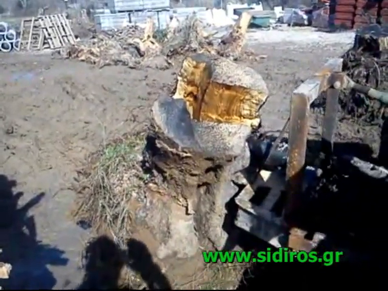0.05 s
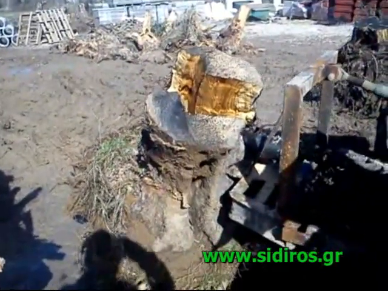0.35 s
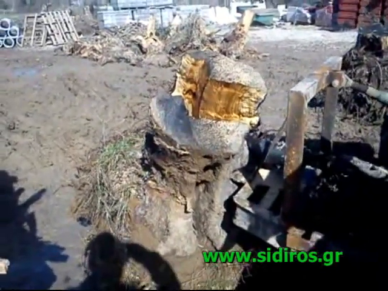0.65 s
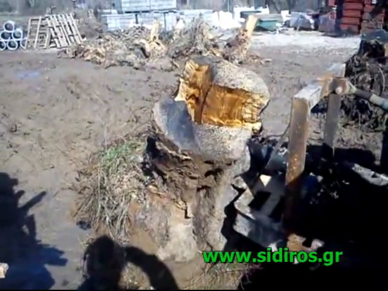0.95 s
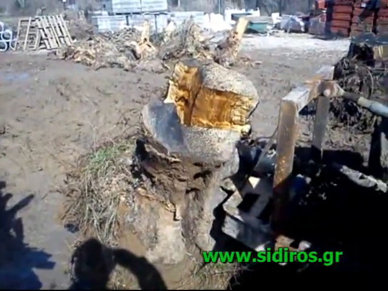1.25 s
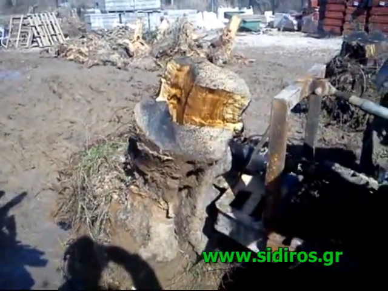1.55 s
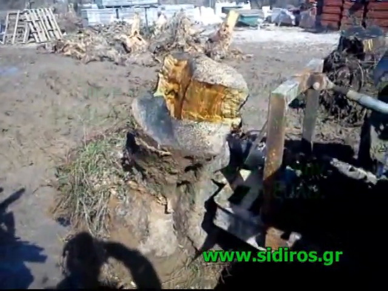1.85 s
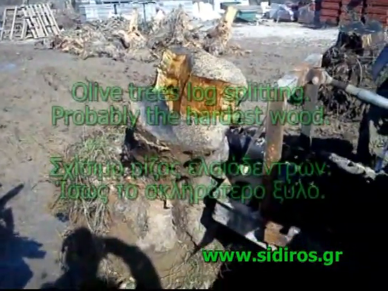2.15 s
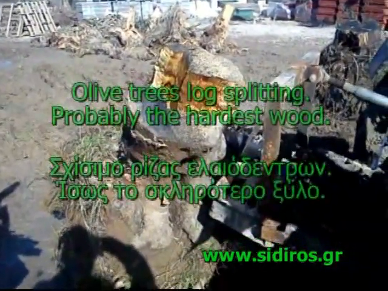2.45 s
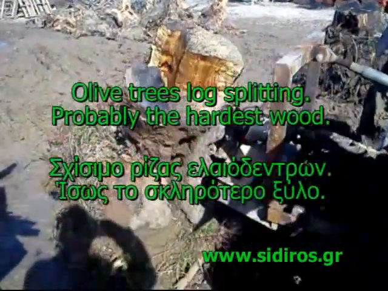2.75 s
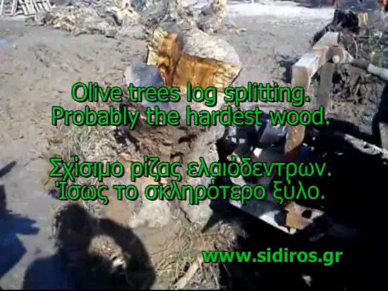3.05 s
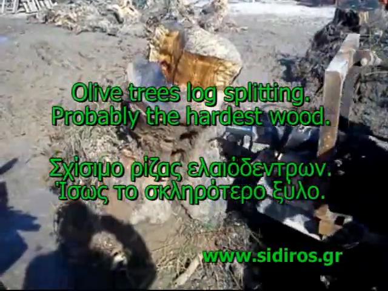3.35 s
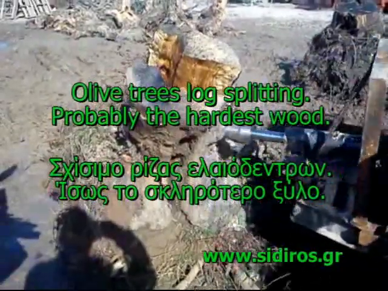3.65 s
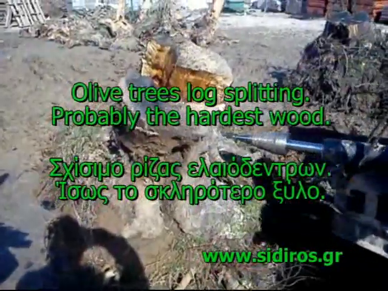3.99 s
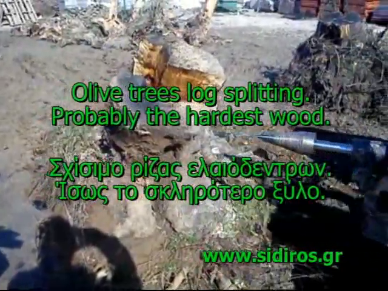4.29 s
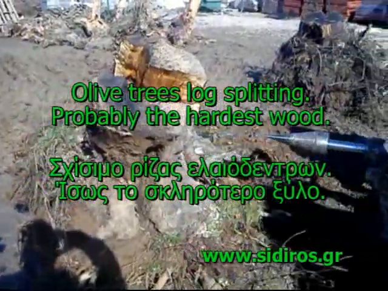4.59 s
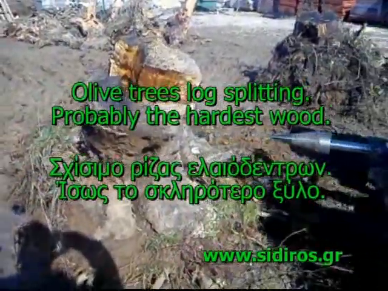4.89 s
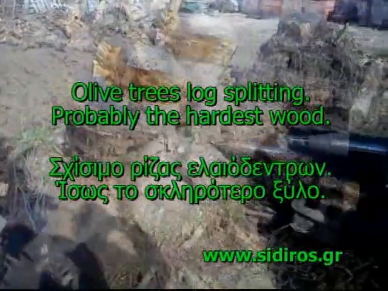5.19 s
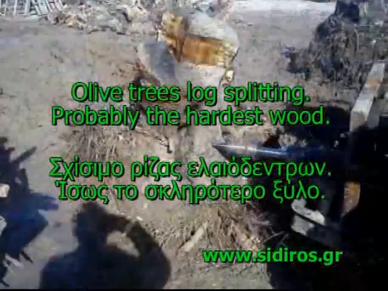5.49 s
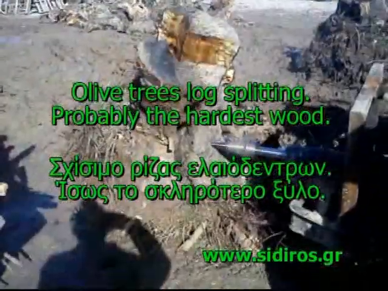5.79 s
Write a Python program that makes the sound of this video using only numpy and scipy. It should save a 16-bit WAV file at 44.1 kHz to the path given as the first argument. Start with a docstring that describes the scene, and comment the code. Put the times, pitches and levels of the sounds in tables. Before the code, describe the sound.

A tractor diesel engine driving a log splitter drones and clatters in an open yard. It gradually slows, barks with two short blips of throttle near the middle, sinks to a low idle, then picks up again toward the end. Loose metal parts clink and chatter throughout, and a faint whine comes and goes. The microphone sounds dull, and the level briefly drops out a few times.

```python
"""In an open yard a four-cylinder tractor diesel drives a screw log splitter, heard on a dull microphone.
The engine coasts down, barks at short blips of throttle, idles and picks up again. Its firings are a
periodic excitation: the exhaust sounds their harmonics, the block drones and knocks, the panels ring,
and the casing sings as the speed passes its resonances. Impacts ring loose parts and the splitter's
steel. The level drops out briefly four times."""
import sys
import numpy as np
from scipy import signal
from scipy.fft import rfft, irfft, next_fast_len
from scipy.io import wavfile
from scipy.ndimage import uniform_filter1d

SR = 44100
rng = np.random.default_rng(int(sys.argv[2]) if len(sys.argv) > 2 else 0)


def unload_wav(signal):
    """Save mono or channel-first audio to the path in sys.argv[1] as 16-bit WAV at rate SR, clipped to [-1, 1]."""
    wavfile.write(
        sys.argv[1],
        SR,
        np.round(np.clip(np.atleast_2d(signal).T, -1, 1) * 32767).astype(np.int16),
    )


N = 261513
TIME = np.arange(N) / SR
FFT_SIZE = next_fast_len(N, True)
FFT_HZ = np.maximum(np.arange(FFT_SIZE // 2 + 1) * SR / FFT_SIZE, 1)


def from_db(db):
    """Amplitude ratio of a level in decibels."""
    return 10 ** (np.asarray(db) / 20)


def rms_one(x):
    """Normalisation to unit power."""
    return x / np.sqrt(np.mean(x ** 2) + 1e-20)


def in_time(rows):
    """Linear interpolation of each column of a time curve at every sample."""
    times, *columns = np.transpose(rows)
    return [np.interp(TIME, times, column) for column in columns]


def trapezoid(start, end, rise_s, fall_s):
    """Linear envelope: rises from start, holds at 1, falls from end."""
    return np.clip((TIME - start) / rise_s, 0, 1) * np.clip(1 - (TIME - end) / fall_s, 0, 1)


def drift(corner_hz):
    """Random modulation: low-passed noise of unit power."""
    spectrum = rfft(rng.standard_normal(FFT_SIZE)) / (1 + (FFT_HZ / corner_hz) ** 2)
    return rms_one(irfft(spectrum, FFT_SIZE)[:N])


def shaped(x, spectrum):
    """Spectral weighting by a gain curve, falling 24 dB an octave above its last point."""
    hz, db = np.transpose(spectrum)
    gain = from_db(np.interp(np.log(FFT_HZ), np.log(hz), db)) / np.maximum(FFT_HZ / hz[-1], 1) ** 4
    return irfft(rfft(x, FFT_SIZE) * gain, FFT_SIZE)[..., :N]


def coloured(x, spectrum):
    """Spectral weighting at unit power."""
    return rms_one(shaped(x, spectrum))


def resonance(x, hz, width_hz):
    """Forced response of two equal two-pole resonators in series, at unit power."""
    radius = np.exp(-np.pi * width_hz / SR)
    b = np.array([1, 0, -1]) * (1 - radius ** 2) / 2
    a = [1, -2 * radius * np.cos(2 * np.pi * hz / SR), radius ** 2]
    return rms_one(signal.lfilter(b, a, signal.lfilter(b, a, x)))


def fuel_feeds():
    """Fuel drives exhaust and knock: gives the throttle (0-1) and the extra knock [dB]."""
    # blips and light holds of fuel: (start [s], end [s], throttle [0-1], extra knock [dB])
    feeds = [(-.04, 0.025, 0.22, 3.5), (0.311, 0.431, 0.3, 2.5), (1.645, 1.721, 0.2, 6.5),
             (2.001, 2.308, 0.52, 7), (2.743, 2.954, 0.47, 3.5), (3.662, 4.91, 0.08, 1.5),
             (5.252, 5.488, 0.22, -1), (5.533, 5.758, 0.14, -0.5)]
    throttle, knock_db = 0, 0
    for start, end, opening, db in feeds:
        feed = trapezoid(start, end, rise_s=.047, fall_s=.03)
        throttle = throttle + opening * feed
        knock_db = knock_db + db * feed ** .18  # the low power makes the knock lead the exhaust
    return np.clip(throttle, 0, 1), knock_db


def knocks(firings, ring_s, uneven_db, random_share, rise_s=0):
    """Impulse excitation: each firing starts a damped burst, part its cylinder's own, part new noise."""
    # strength of each cylinder in firing order: (level [dB])
    cylinder_db = [.6, .2, -.2, -.5]
    onsets = np.flatnonzero(np.diff(np.floor(firings), prepend=-1) > 0)
    strength = from_db(uneven_db * rng.standard_normal(len(onsets)))
    age = TIME[:SR // 10]
    envelope = np.exp(-age / ring_s) * (1 - np.exp(-age / (rise_s + 1 / SR)))
    repeating, power, cylinders = 0, 0, len(cylinder_db)
    for k, db in enumerate(cylinder_db):
        blows = np.zeros(N)
        blows[onsets[k::cylinders]] = strength[k::cylinders] * from_db(db)
        repeating = repeating + signal.oaconvolve(blows, envelope * rng.standard_normal(len(age)))[:N]
        power = power + signal.oaconvolve(blows ** 2, envelope ** 2)[:N]
    fresh = np.sqrt(np.abs(power)) * rng.standard_normal(N)
    return np.sqrt(1 - random_share) * rms_one(repeating) + np.sqrt(random_share) * rms_one(fresh)


def bunching(firings, throttle, swing_db=5):
    """Amplitude modulation at the firing rate: throttle gathers sound into knocks, at even power."""
    gain = from_db(swing_db * throttle * np.cos(2 * np.pi * (firings - .2)))
    return gain / np.sqrt(uniform_filter1d(gain ** 2, size=2400))


def hiss(sound):
    """Envelope following: a thin, high noise rises and falls with the sound."""
    # spectrum of the hiss: (frequency [Hz], level [dB])
    spectrum = [(9000, -33), (12500, -11.5), (13900, -2), (15500, -8)]
    loudness = rms_one(np.sqrt(np.abs(uniform_filter1d(sound ** 2, size=400))))
    return from_db(-84.5) * loudness * coloured(rng.standard_normal(N), spectrum)


def sizzle(sound, carrier_hz=8000):
    """Ring modulation: faint sidebands mirror the sound on both sides of a carrier."""
    # weighting of the sidebands: (frequency [Hz], gain [dB])
    sidebands = [(3000, -71.5), (4000, -4), (4600, -10.5), (4900, -19), (5200, -26.5), (5500, -39.5),
                 (5750, -58.5), (6000, -54), (6400, -68.5), (6700, -56), (7100, -75.5), (7700, -65),
                 (8300, -66), (8900, -75), (12000, -76)]
    return shaped(2 * sound * np.cos(2 * np.pi * carrier_hz * TIME), sidebands)


def tick(at_s=2.7425):
    """A single impulse has a flat spectrum: one short, bright click."""
    return from_db(-25) * (np.arange(N) == round(at_s * SR))


def level_drops():
    """Gain modulation: the level falls within a millisecond and recovers."""
    # dips: (time [s], depth [dB], recovery [s], exponent [1], under 1 for a late recovery)
    drops = [(1.742, -24, .019, 1), (2.742, -28, .018, .7), (4.9115, -21, .0135, .35),
             (4.945, -22.5, .45, 1.5)]
    db = 0
    for at_s, depth_db, recovery_s, bend in drops:
        db = db + depth_db * (TIME >= at_s) * np.clip(1 - (TIME - at_s) / recovery_s, 0, 1) ** bend
    return uniform_filter1d(from_db(db), size=44)


def overload_cracks(decay_s=.00049, gain_db=9.5):
    """Broadband transients: short, bright overload cracks at the loudest peaks of the throttle blips."""
    # cracks: (time [s], relative level [dB])
    cracks = [(2.05, -18), (2.236, -13.5), (2.258, -13), (2.273, -10), (2.293, -15), (2.879, -6),
              (2.899, -23.5), (2.914, -14), (2.934, -24.5)]
    # colour of a crack: (frequency [Hz], gain [dB])
    spectrum = [(200, -11), (450, 3.5), (1400, -1), (2500, -3), (3300, -1), (4000, -3)]
    out, age = np.zeros(N), TIME[:SR // 100]
    for at_s, db in cracks:
        burst = np.exp(-age / decay_s) * rng.standard_normal(len(age))
        start = int(at_s * SR)
        out[start:start + len(age)] += from_db(db + gain_db) * burst / np.linalg.norm(burst)
    return shaped(out, spectrum)


def splitter_chatter(hits_per_s=720):
    """Modal ringing: quick, uneven runs of contacts excite the splitter's steel."""
    # modes of the steel: (frequency [Hz], bandwidth [Hz], relative level [dB])
    modes = [(2187, 180, 0.5), (2475, 56, -1.5), (2793, 290, -4), (3114, 230, -3.5)]
    # bursts of contact: (time [s], duration [s], level [dB])
    bursts = [(2.117, 0.09, -29), (2.76, 0.072, -30), (3.48, .05, -36.5), (3.527, 0.055, -36),
              (3.705, 0.04, -36), (3.831, .06, -32), (3.881, .04, -34.5), (3.962, .07, -39),
              (4.139, .085, -33), (4.348, .04, -36.5), (4.4, .06, -35), (4.734, 0.039, -36.5),
              (4.93, 0.023, -39.5)]
    hits = rng.random(N) < hits_per_s / SR
    ringing, envelope = 0, 0
    for hz, width, db in modes:
        blows = hits * rng.uniform(.36, 1, N) * rng.choice([-1, 1], N) + 1e-18
        ringing = ringing + from_db(db) * resonance(blows, hz, width)
    for at_s, length_s, db in bursts:
        progress = np.clip((TIME - at_s) / length_s, 0, 1)
        envelope = envelope + from_db(db) * np.sqrt(np.abs(np.sin(np.pi * progress)))
    return envelope * rms_one(ringing)


def rattles(rise_s=.0083, width_hz=91):
    """Damped vibration: loose parts ring briefly, a random walk of phase broadening each tone."""
    # rings of loose parts: (time [s], frequency [Hz], peak level [dB])
    rings = [(.03, 1895, -25.5), (0.099, 1735, -23.5), (0.412, 1580, -30), (.412, 2170, -29),
             (0.534, 1530, -25), (.789, 1880, -25.5), (1.687, 2017, -23.5), (1.707, 1305, -19),
             (1.952, 1900, -27.5), (2.03, 1905, -21), (2.161, 2416, -31), (2.22, 2260, -29),
             (2.287, 1254, -15), (2.578, 1920, -23.5), (2.823, 1970, -21), (2.874, 1203, -15),
             (2.928, 1310, -15.5), (3.187, 1950, -30), (3.219, 1924, -23.5), (3.748, 1970, -28),
             (3.763, 1513, -31), (3.789, 2490, -27), (3.902, 2035, -24.5), (3.966, 1120, -20),
             (4.044, 1055, -21.5), (4.134, 995, -21), (4.173, 2357, -28.5), (4.36, 2150, -25.5),
             (4.492, 1443, -19.5), (4.511, 1864, -30.5), (4.749, 2516, -35.5), (4.812, 1970, -28.5),
             (4.83, 1523, -24.5), (4.935, 1080, -18.5), (5.719, 1956, -28), (5.836, 1620, -27),
             (5.89, 1710, -23.5)]
    out, age = np.zeros(N + SR), TIME[:SR // 8]
    envelope = age / rise_s * np.exp(1 - age / rise_s)
    for at_s, hz, db in rings:
        wander = np.cumsum(rng.standard_normal(len(age))) * np.sqrt(2 * np.pi * width_hz / SR)
        phase = 2 * np.pi * hz * age + uniform_filter1d(wander, size=88)
        start = int(at_s * SR)
        out[start:start + len(age)] += from_db(db) * envelope * np.sin(phase)
    return out[:N]


def casing_whine(firing_hz, centre_hz=882, pull=.4, waver_db=1.5, wobble_rad=.45):
    """Forced vibration: the casing whines in set spells, its pitch pulled along by the engine speed."""
    # spells of whining: (start [s], end [s], level [dB])
    spells = [(.06, .15, -28), (.43, .52, -25), (1.1, 1.35, -25.5), (2.06, 2.32, -33), (2.44, 2.68, -21.5),
              (2.77, 2.96, -31), (3.08, 3.34, -22.5), (3.34, 3.46, -28), (4.93, 5.3, -22)]
    out, flutter, wobble = 0, from_db(waver_db * drift(30)), wobble_rad * drift(40)
    for start, end, db in spells:
        envelope = trapezoid(start, end, rise_s=.04, fall_s=.04)
        midway_hz = np.interp((start + end) / 2, TIME, firing_hz)
        pitch = centre_hz * (1 + pull * (firing_hz / midway_hz - 1))
        out = out + from_db(db) * envelope * np.sin(2 * np.pi * np.cumsum(pitch) / SR + wobble)
    return flutter * out


def casing_rings(firing_hz, throttle, pull=.22, waver_db=2.6, wobble_rad=.55):
    """Resonance: each casing mode swells and fades as the engine passes its critical speed."""
    # modes: (firing rate [Hz], its span [Hz], frequency [Hz], level [dB], full-throttle gain [dB])
    modes = [(50.8, 4.4, 326, -5, -10), (61.5, 1.5, 648, -11, 0), (57.5, 1.8, 1295, -17, 17),
             (50.2, 1.6, 1290, -11, 16)]
    # gain common to the modes: (time [s], level [dB])
    level_curve = [(0, -32), (.6, -39), (1.0, -38), (1.15, -24.5), (1.33, -25), (1.45, -28), (2.0, -26.5),
                   (2.6, -29.5), (3.3, -30), (3.7, -34.5), (4.85, -27), (4.97, -28), (5.28, -26),
                   (5.4, -27), (5.93, -17)]
    common_db, = in_time(level_curve)
    out, flutter, wobble = 0, from_db(waver_db * drift(36)), wobble_rad * drift(54)
    for critical_hz, span_hz, hz, db, throttle_db in modes:
        in_tune = 1 / np.sqrt(1 + (2 * (firing_hz - critical_hz) / span_hz) ** 6)
        pitch = hz * (1 + pull * (firing_hz / critical_hz - 1))
        tone = np.sqrt(2) * np.sin(2 * np.pi * np.cumsum(pitch) / SR + wobble)
        out = out + from_db(db + throttle_db * throttle) * in_tune * tone
    return from_db(common_db) * flutter * out


def panels(firings, throttle, idle_db=-17.5):
    """Plate resonance: firings ring the sheet metal, the more so under throttle."""
    # panel modes: (frequency [Hz], bandwidth [Hz], relative level [dB])
    modes = [(644, 26, -27), (883, 110, -24), (1271, 46, -33.5), (1460, 140, -41), (1900, 700, -34.5),
             (2200, 88, -51), (3192, 120, -50)]
    blows = knocks(firings, ring_s=.006, uneven_db=2.5, random_share=.7)
    ringing = sum(from_db(db) * resonance(blows, hz, width) for hz, width, db in modes)
    return (from_db(idle_db) + throttle) * bunching(firings, throttle) * ringing


def phasey_sweep(x, lag_s=.0044, sway=.204, delayed_db=-4.5):
    """Comb filtering: a wandering short delay gives the clatter a shifting, phasey, metallic colour."""
    lag = lag_s * np.exp(sway * drift(2.13))
    return rms_one(x + from_db(delayed_db) * np.interp(TIME - lag, TIME, x))


def treble_shelf(x, corner_hz=2640):
    """Shelving filter: the treble rises and falls along a curve."""
    # gain of the treble: (time [s], level [dB])
    treble_curve = [(0, -7), (.8, -2.5), (2.05, -3.5), (2.26, -3.5), (2.72, 2), (2.9, 0.5), (3.6, -1.5),
                    (4.0, -5.5), (4.9, -1.5), (5.4, -7), (5.93, -3)]
    treble_db, = in_time(treble_curve)
    treble = signal.sosfiltfilt(signal.butter(3, corner_hz, "high", fs=SR, output="sos"), x)
    return x + (from_db(treble_db) - 1) * treble


def clatter(firings, throttle, surge_s=.061):
    """Impact noise of valves and injectors; throttle mixes in a shorter, harder knock."""
    # spectrum of the impacts: (frequency [Hz], level [dB])
    spectrum = [(500, -14.5), (800, -2), (1000, 1.5), (1150, 0.5), (1350, 1.5), (1700, -1.5), (1950, -2.5),
                (2350, -5.5), (2600, -9), (3100, -12.5), (3500, -23.5), (4000, -35)]
    # passing swells and dips: (time [s], level [dB])
    surges = [(2.6, 2), (2.8, 2.5), (3.24, 2.5), (3.65, 2), (3.861, 2), (4.25, -0.5), (4.68, -2.5),
              (4.769, 2.5)]
    loose = knocks(firings, ring_s=.016, uneven_db=1, random_share=.45, rise_s=.007)
    hard = knocks(firings, ring_s=.007, uneven_db=1.2, random_share=.5, rise_s=.002)
    hardness = .5 * throttle
    impacts = np.sqrt(1 - hardness) * coloured(loose, spectrum)
    impacts += np.sqrt(hardness) * coloured(hard, spectrum)
    surge_db = sum(db * np.exp(-((TIME - at_s) / surge_s) ** 2) for at_s, db in surges)
    return from_db(surge_db) * bunching(firings, throttle) * treble_shelf(phasey_sweep(impacts))


def block_hum(firings, firing_hz, waver_db=4.5):
    """Unequal cylinders put lines between the harmonics, which swell at the block's resonances."""
    # lines of the four-firing cycle: (multiple of the firing rate [1], level [dB])
    orders = [(2.25, -9), (2.5, -5), (3.5, -6), (3.75, 0), (4, -2), (4.25, 0), (4.5, -3), (4.75, 1),
              (5, -3), (5.25, -9), (5.5, -1), (5.75, 0), (6, -3), (6.25, -7), (6.5, 2), (6.75, -7), (7, -7),
              (7.5, -7), (8, -6), (8.5, -1), (9, -4)]
    # response of the block: (frequency [Hz], gain [dB])
    response = [(110, -4), (165, -6), (190, -6), (215, 0), (245, 0), (274, 6), (300, 1), (322, 5),
                (360, -5), (418, 3.5), (480, -5), (600, -7)]
    body_hz, body_db = np.transpose(response)
    knots = np.linspace(0, TIME[-1], 40)
    tones = 0
    for multiple, db in orders:
        waver = np.interp(TIME, knots, waver_db * rng.standard_normal(len(knots)))
        level = from_db(db + np.interp(multiple * firing_hz, body_hz, body_db) + waver)
        slip = np.interp(TIME, knots, np.cumsum(rng.normal(0, .24, len(knots))))
        tones = tones + level * np.cos(2 * np.pi * (multiple * firings + rng.random() + slip))
    return rms_one(tones)


def block_drone(firings, firing_hz, throttle, thud_db=-3, hum_db=-3.5, throttle_db=2.5):
    """Structure-borne sound: the block thuds and hums with the firings, swelling under throttle."""
    # spectrum of the thuds: (frequency [Hz], level [dB])
    spectrum = [(20, -54), (45, -26.5), (80, -9), (120, 2), (170, 1), (210, 5.5), (275, -6.5), (365, -4),
                (425, -3), (560, -4.5), (660, -3.5), (800, -4.5), (1000, -10), (1400, -46)]
    blows = knocks(firings, ring_s=.028, uneven_db=.8, random_share=.55, rise_s=.002)
    thud = from_db(thud_db) * coloured(blows, spectrum)
    hum = from_db(hum_db) * block_hum(firings, firing_hz)
    return from_db(throttle_db * throttle) * (thud + hum)


def exhaust(firings, firing_hz, throttle, puff_db=-32, chug_db=1.5):
    """Source and filter: in-phase harmonics pulse through the pipe; throttle adds treble and a puff."""
    # harmonics: (multiple of the firing rate [1], coasting level [dB], level of the throttle's part [dB])
    harmonics = [(1, -55, -33), (2, -25, -21), (3, -36, -10.5), (4, -36, -14.5), (5, -43, -25),
                 (6, -36, -21), (7, -45, -24), (8, -45, -26), (9, -45, -27)]
    # resonances of the pipe: (frequency [Hz], gain [dB])
    response = [(92, -10), (101, -6), (108, 2), (120, 3.5), (126, 3), (134, -1), (158, -2), (171, 3),
                (182, 1), (195, 6), (207, 3.5), (220, 2.5), (236, -2.5), (258, -11), (290, -4),
                (350, -11.5)]
    pipe_hz, pipe_db = np.transpose(response)
    note = 0
    for multiple, coasting_db, throttle_db in harmonics:
        waver_db = .9 * (1.5 - throttle) * drift(4.3)
        pipe = from_db(np.interp(multiple * firing_hz, pipe_hz, pipe_db) + waver_db)
        drive = from_db(coasting_db) + throttle * from_db(throttle_db)
        note = note - np.sqrt(2) * pipe * drive * np.cos(2 * np.pi * multiple * firings)
    gas = knocks(firings, ring_s=.007, uneven_db=1.5, random_share=.5)
    puff = resonance(gas, hz=205, width_hz=130)
    chug = from_db(chug_db * (1 - throttle) * drift(22))  # pulses are least even when coasting
    return chug * note + throttle * from_db(puff_db) * puff


def scene():
    """Superposition: one crankshaft times exhaust, block and panels; casing and loose steel join in."""
    # engine speed: (time [s], firing rate [Hz])
    speed = [(0, 67.29), (.33, 62.51), (.47, 66.42), (.75, 61.21), (1.2, 54.37), (1.63, 48.37),
             (1.75, 50.14), (2.0, 48.57), (2.33, 58.23), (2.74, 50.78), (2.97, 58.88), (3.3, 52.58),
             (3.67, 46.22), (4.25, 49.25), (4.91, 47.25), (4.97, 52.59), (5.25, 55.08), (5.7, 62.04),
             (5.93, 61.88)]
    # balance as the microphone moves: (time [s], exhaust level [dB], drone level [dB], clatter level [dB])
    balance = [(0, -0.5, -21.5, -30), (.6, -1.5, -19.5, -30), (1.05, -3, -20, -31),
               (1.55, -0.5, -18.5, -29.5), (1.85, -0.5, -19.5, -30), (2.3, -1.5, -17, -28),
               (3.3, 0.5, -18, -28.5), (3.6, 3, -18.5, -28), (4.1, -5.5, -17, -24), (4.8, -1.5, -19, -26.5),
               (5.05, -3.5, -21, -28), (5.3, -4.5, -24, -30.5), (5.6, -1, -22.5, -25),
               (5.93, -10.5, -18.5, -28)]
    firing_hz, = in_time(speed)
    exhaust_db, drone_db, clatter_db = in_time(balance)
    throttle, knock_db = fuel_feeds()
    # running count of firings, slightly delayed and jittered
    firings = np.cumsum(firing_hz) / SR - .0015 * firing_hz[0] + .012 * drift(8)
    mix = from_db(exhaust_db) * exhaust(firings, firing_hz, throttle)
    mix += from_db(drone_db) * block_drone(firings, firing_hz, throttle)
    mix += from_db(clatter_db + knock_db) * clatter(firings, throttle)
    mix += panels(firings, throttle) + overload_cracks() + rattles() + splitter_chatter()
    mix += casing_rings(firing_hz, throttle) + casing_whine(firing_hz)
    return (mix * level_drops())[None]


def record(dry, ceiling=.85, microphone_hz=4150, cutoff_hz=15700):
    """Saturation and band limiting: a dull microphone with rounded peaks, faint sizzle, hiss and a tick."""
    rounded = dry / (1 + (dry / ceiling) ** 8) ** .125
    dull = signal.sosfilt(signal.cheby1(10, .3, microphone_hz, fs=SR, output="sos"), rounded)
    out = dull + sizzle(dull) + hiss(dull) + tick()
    return signal.sosfilt(signal.cheby1(10, .3, cutoff_hz, fs=SR, output="sos"), out)


dry = scene()
out = record(dry)
unload_wav(out)
```